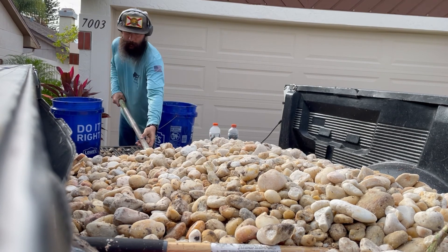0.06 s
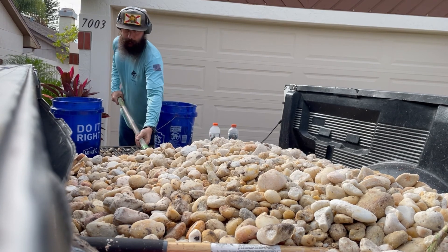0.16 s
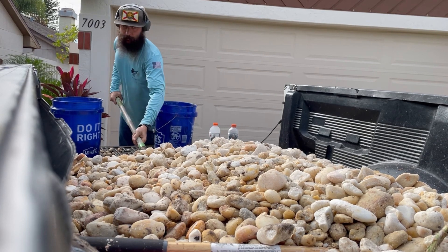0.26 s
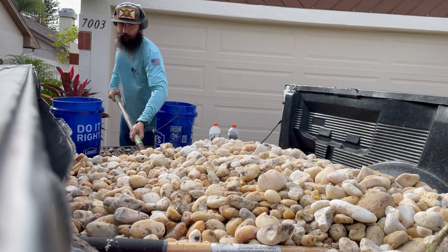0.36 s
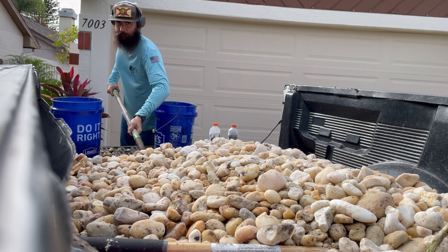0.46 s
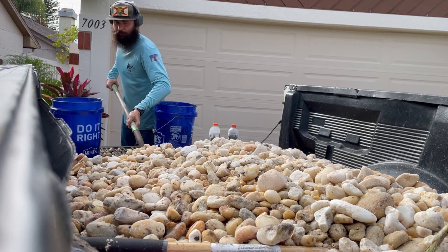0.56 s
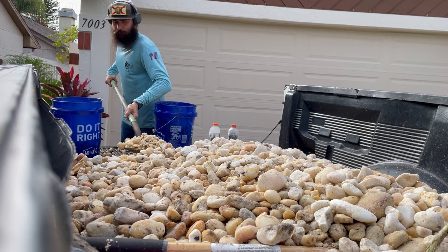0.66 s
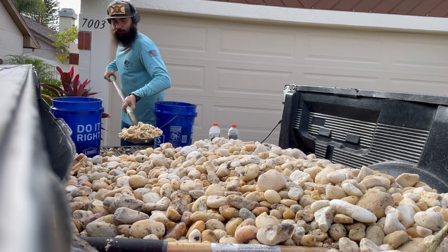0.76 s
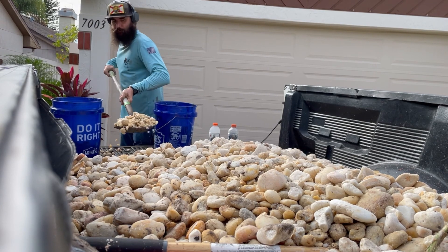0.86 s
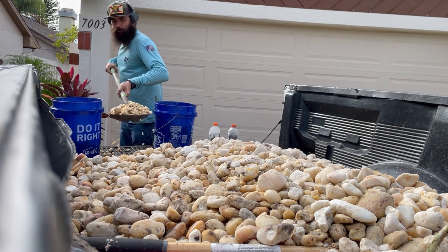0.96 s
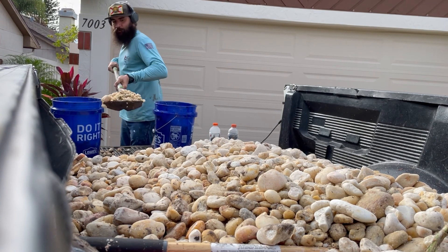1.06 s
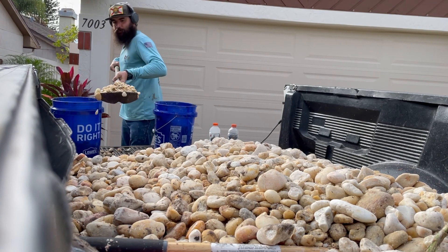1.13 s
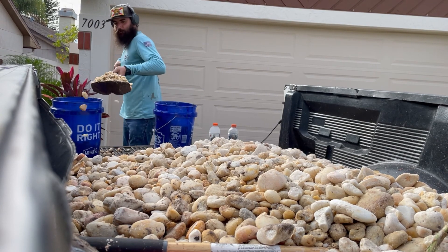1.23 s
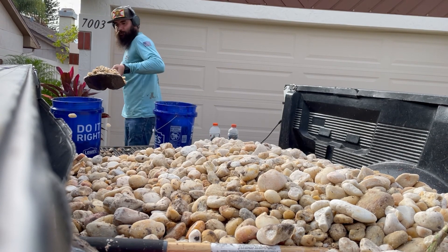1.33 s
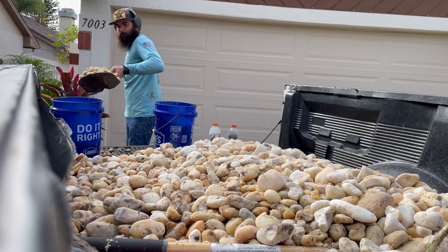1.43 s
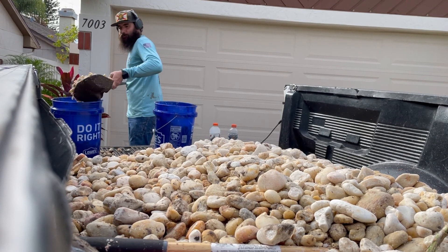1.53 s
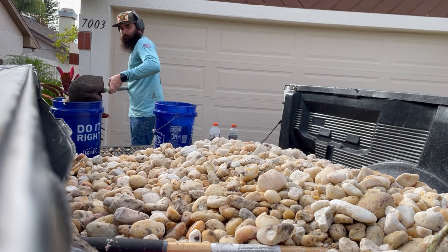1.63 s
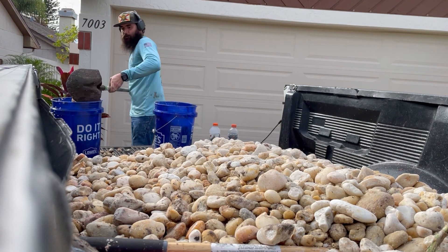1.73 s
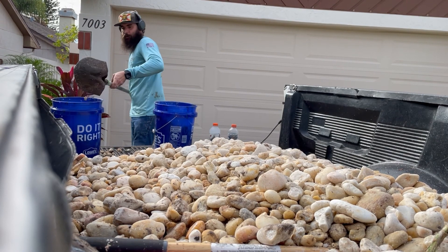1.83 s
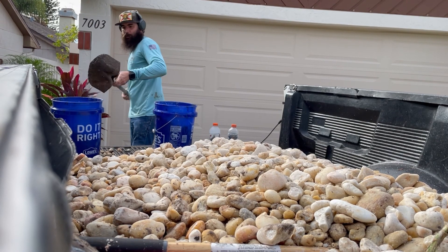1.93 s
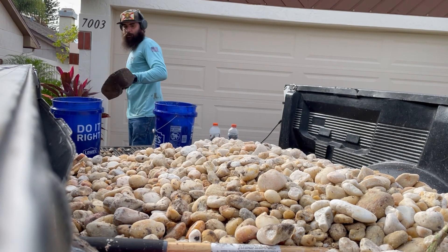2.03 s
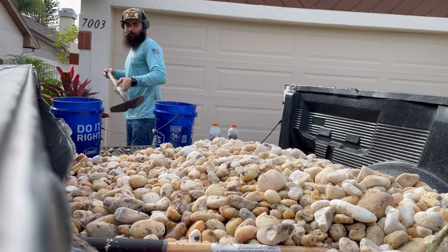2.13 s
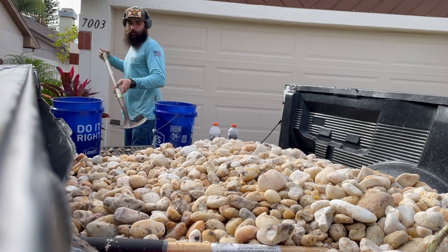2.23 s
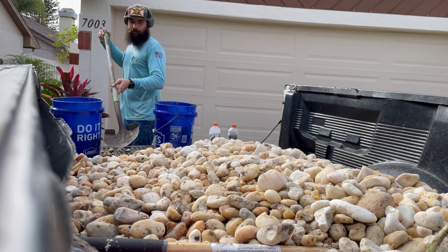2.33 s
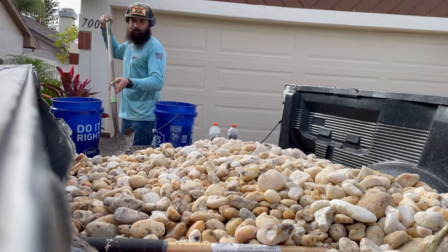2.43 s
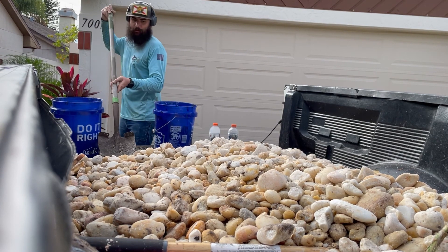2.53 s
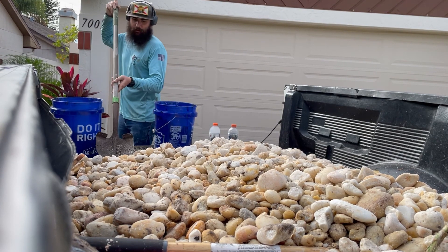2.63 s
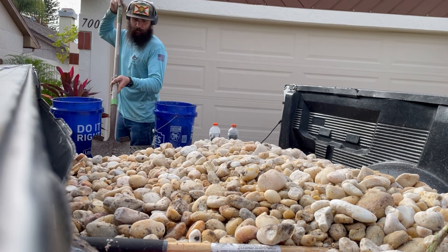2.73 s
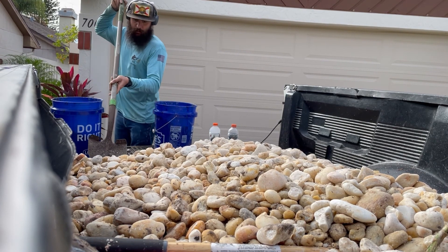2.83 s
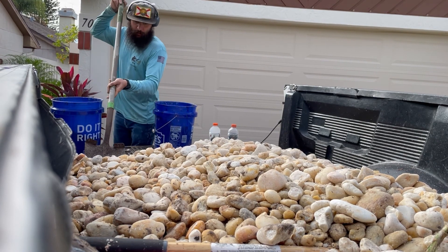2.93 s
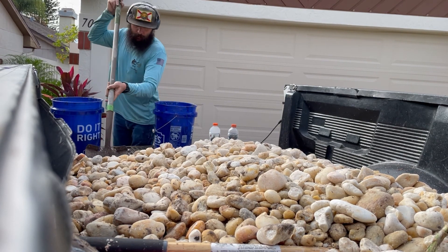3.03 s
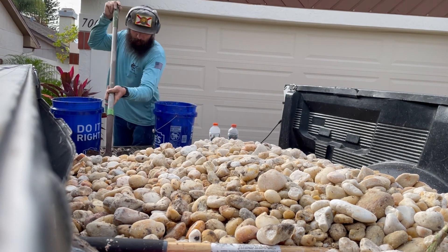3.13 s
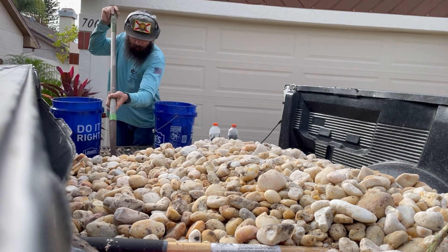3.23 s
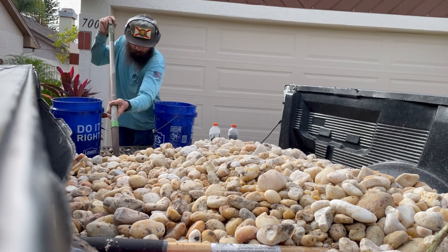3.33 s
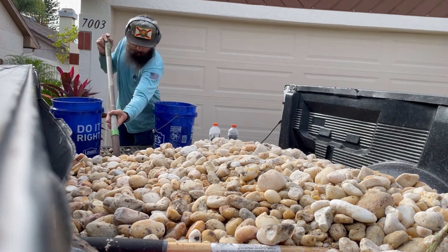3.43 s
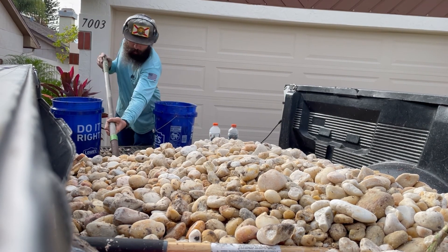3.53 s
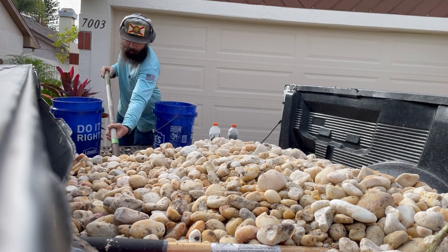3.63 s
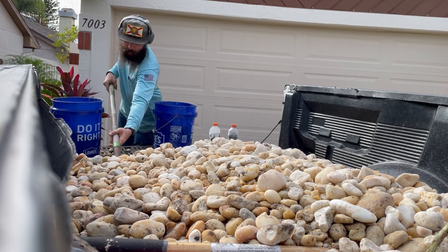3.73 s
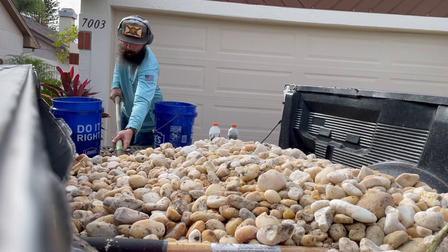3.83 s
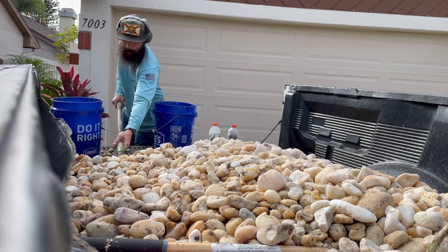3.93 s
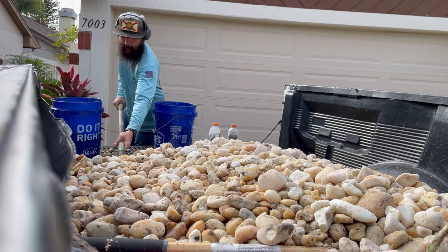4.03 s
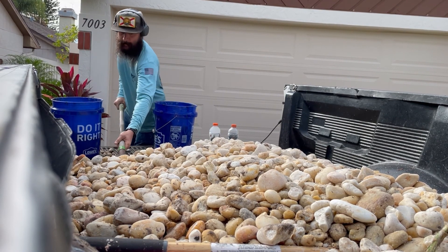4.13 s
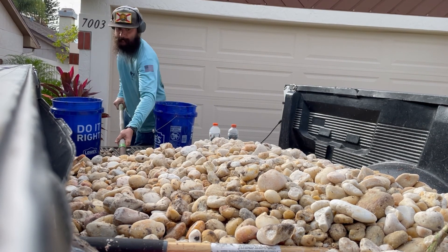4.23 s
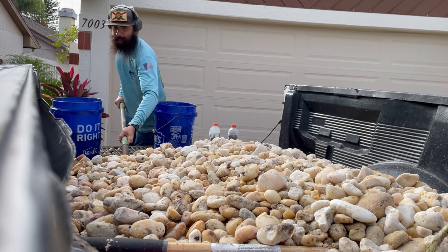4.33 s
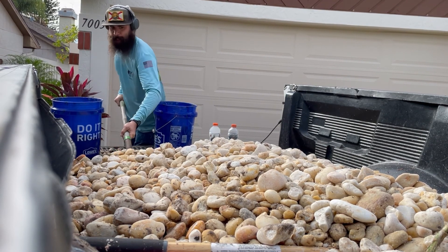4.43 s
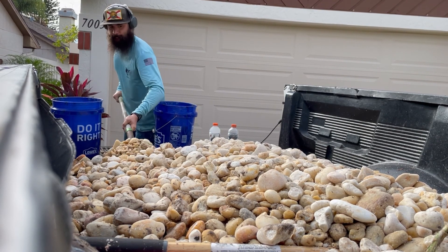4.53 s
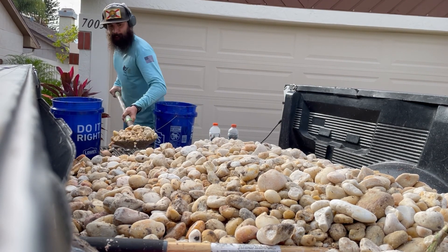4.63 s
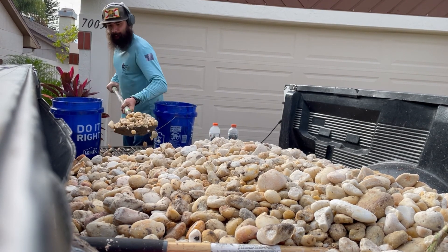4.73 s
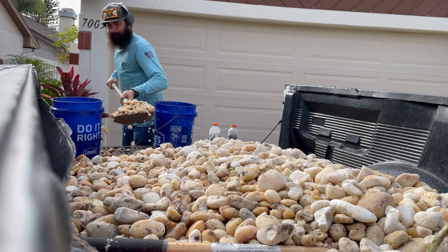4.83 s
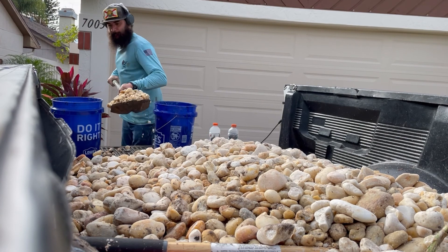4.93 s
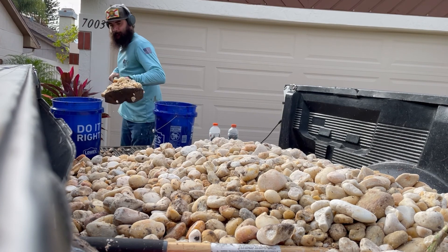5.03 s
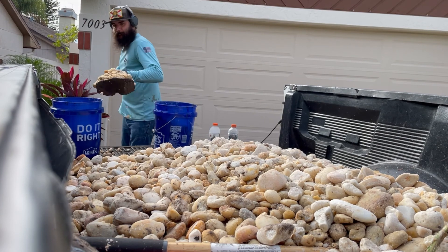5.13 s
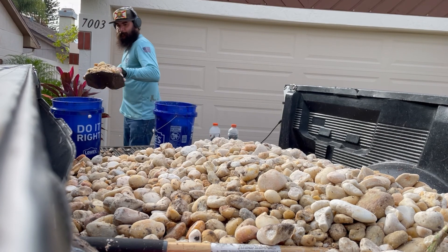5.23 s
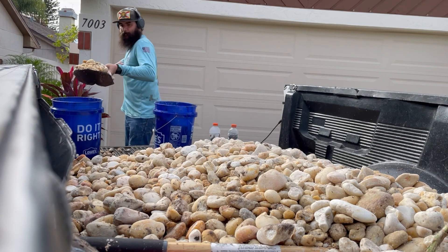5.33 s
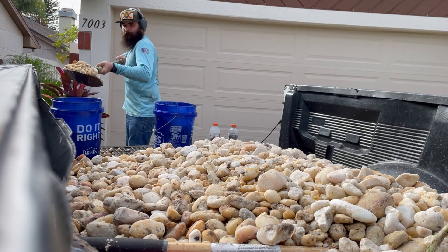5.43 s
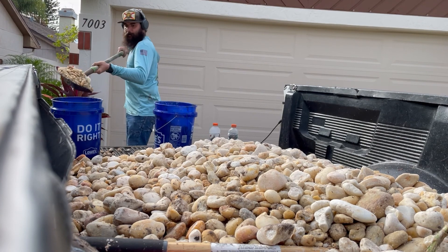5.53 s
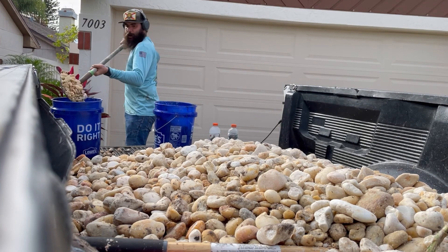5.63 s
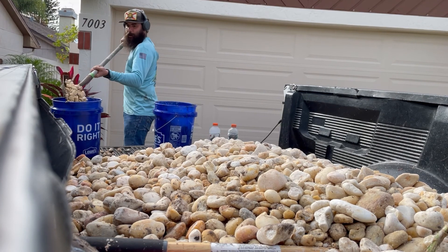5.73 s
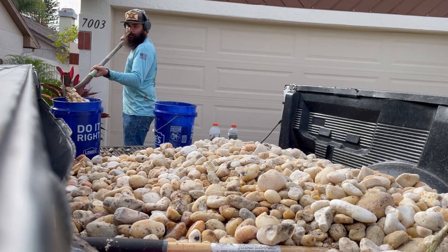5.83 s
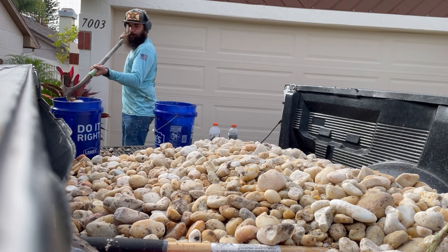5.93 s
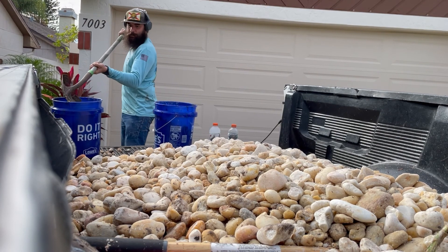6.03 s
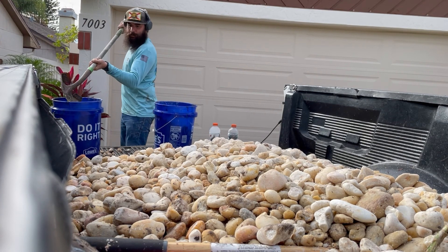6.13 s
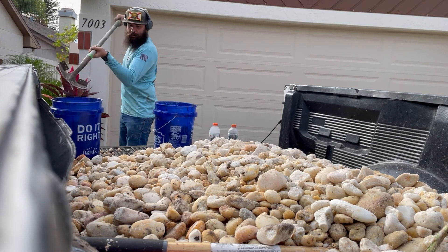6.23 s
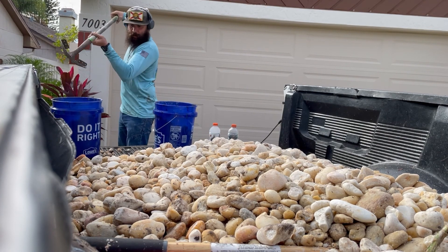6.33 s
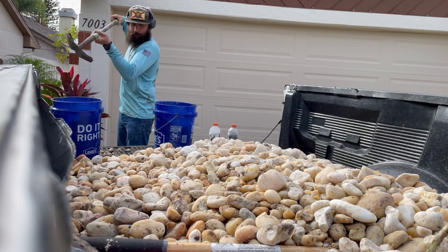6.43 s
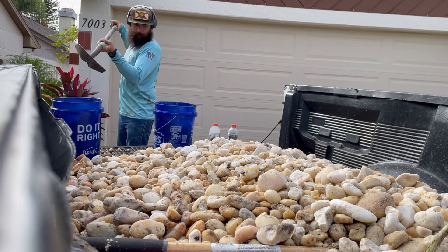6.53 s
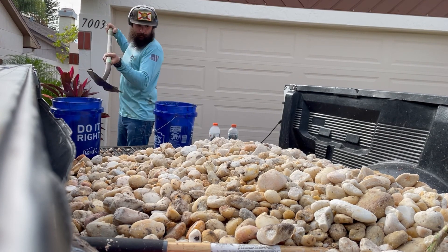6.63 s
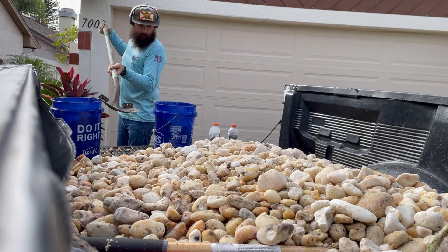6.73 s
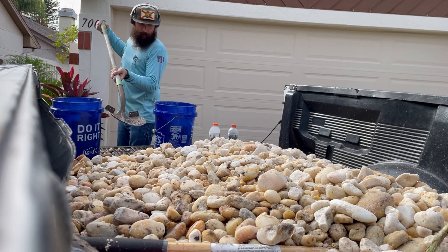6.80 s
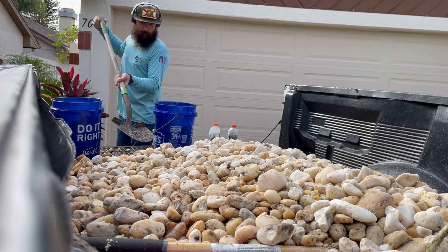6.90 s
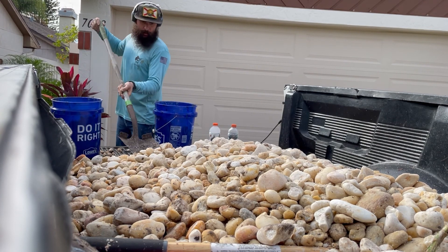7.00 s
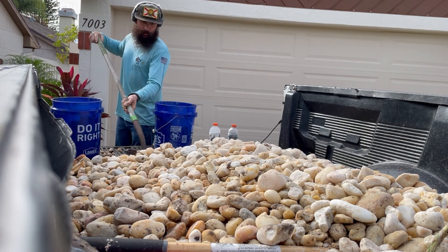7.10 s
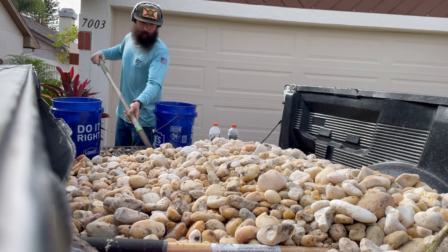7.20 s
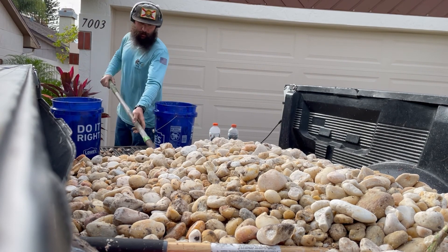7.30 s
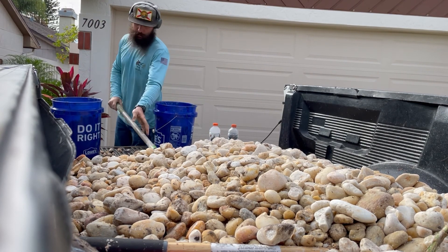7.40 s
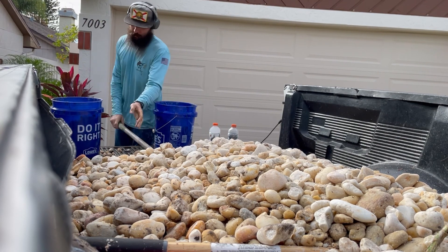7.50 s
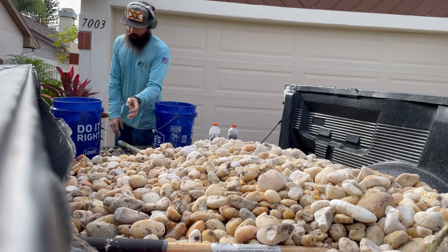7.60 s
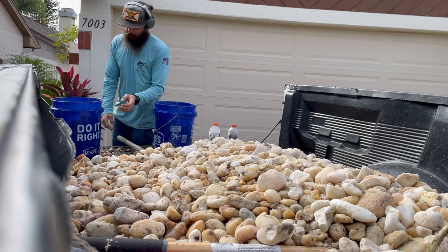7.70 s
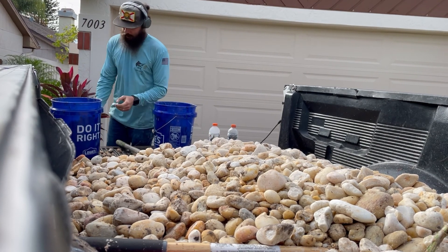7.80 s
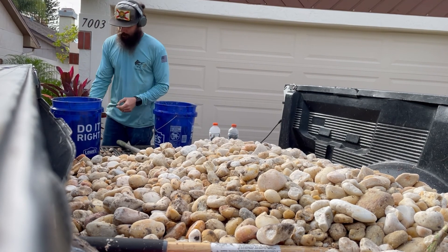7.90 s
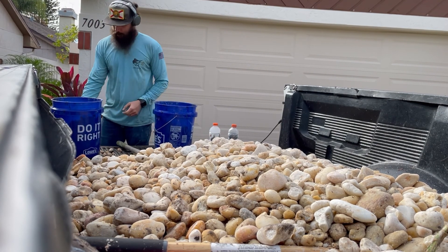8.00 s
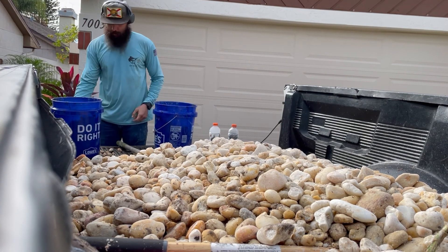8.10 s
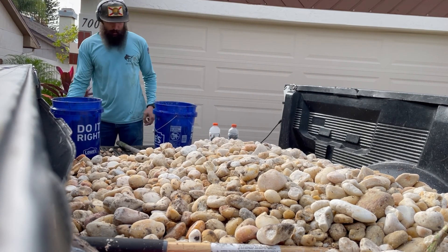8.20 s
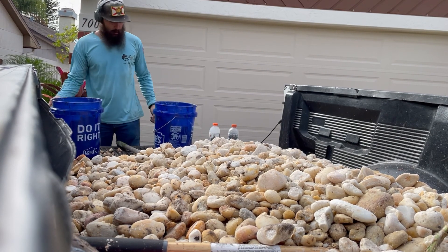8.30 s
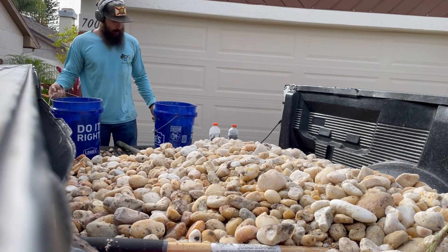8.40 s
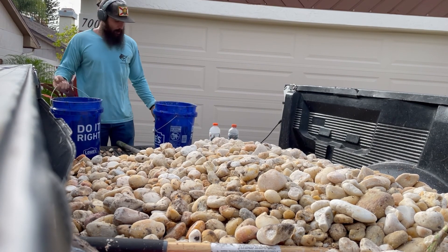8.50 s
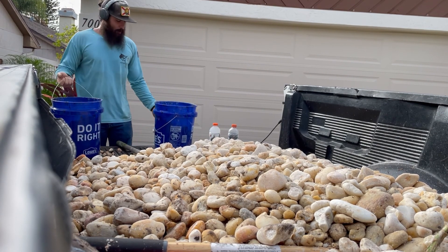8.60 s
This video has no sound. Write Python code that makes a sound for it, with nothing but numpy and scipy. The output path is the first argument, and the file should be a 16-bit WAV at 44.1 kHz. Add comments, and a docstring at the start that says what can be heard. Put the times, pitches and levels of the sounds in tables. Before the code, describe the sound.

Close in a pickup bed, a steel shovel finishes a scoop with grinding and knocks, then big stones drop and rattle into a hollow plastic bucket. A harsh, singing scrape follows as the blade drives in again, stones clack and snap, and a second load clatters down. Finally the shovel scrapes in and thuds onto the liner. Quiet driveway, faint low traffic, short echoes.

```python
"""A steel shovel digs river stones from a pickup bed and tips them into a plastic bucket, twice; then it is laid down.
The blade rasps and sings by stick-slip as it grinds through the pile; stones click together in random collisions,
knock on the ribbed liner as dispersive bending waves, and drum the modes of the bucket.
Heavy landings boom in the modes of the bed, whose side walls reflect the sound.
A phone with two ports lies in the bed, in a quiet driveway with a low rumble of far traffic."""
import sys
import numpy as np
from scipy import signal
from scipy.fft import rfft, irfft, next_fast_len
from scipy.io import wavfile
from scipy.ndimage import uniform_filter1d

SR = 44100
rng = np.random.default_rng(int(sys.argv[2]) if len(sys.argv) > 2 else 0)


def inscribe(sig):
    """Save sig as 16-bit PCM at rate SR to the path in sys.argv[1].

    A 1-D sig is mono; a 2-D sig holds one channel per row.
    Samples are clipped to [-1, 1] before scaling.
    """
    pcm = np.round(np.clip(np.atleast_2d(sig).T, -1, 1) * 32767)
    wavfile.write(sys.argv[1], SR, pcm.astype(np.int16))


N = 381796
T = np.arange(N) / SR
RING_T = T[:12000]  # time axis of one collision

# Levels in the tables are relative: the functions add their own gains, and the echoes and filters follow.


def undb(db):
    """Logarithmic level: decibels to amplitude gain."""
    return 10 ** (np.asarray(db) / 20)


def unit(x):
    """Energy normalization: scale each row to an energy of one."""
    return x / np.sqrt(np.sum(x ** 2, axis=-1, keepdims=True))


def peak(x):
    """Peak normalization: scale a (mid, side) pair to a mid peak of one."""
    return x / np.abs(x[0]).max()


def on_bins(points, size):
    """Log-frequency interpolation: read a table over frequency at the bins of a transform."""
    hz, value = np.transpose(points)
    bins_hz = np.fft.rfftfreq(size, 1 / SR)
    return np.interp(np.log(bins_hz + 1), np.log(hz), value)


def colour(x, points):
    """Minimum-phase filtering: folding the cepstrum gives a causal filter with the tabled spectrum."""
    size = next_fast_len(x.shape[-1] // 2 + len(RING_T) // 2) * 2
    cepstrum = irfft(np.log(undb(on_bins(points, size))))
    response = np.exp(rfft(2 * cepstrum[:size // 2], size) - cepstrum[0])
    return irfft(rfft(x, size) * response)[..., :x.shape[-1]]


def through(x, response):
    """Convolution: pass a (mid, side) pair through an impulse response."""
    return signal.oaconvolve(x, response, axes=-1)[:, :x.shape[1]]


def add(out, s, sound):
    """Superposition: mix a (mid, side) sound in at a time in seconds."""
    start = max(int(s * SR), 0)
    out[:, start:start + sound.shape[1]] += sound[:, :N - start]


def fade(t60):
    """Exponential damping: a decay of 60 dB in t60 seconds."""
    return np.exp(-np.log(1000) * RING_T / t60)


def burst(t60):
    """High modal density: countless close modes die together as noise, independent in mid and side."""
    return unit(rng.standard_normal((2, len(RING_T))) * fade(t60))


def ring(modes, jitter=0.0047):
    """Modal synthesis: a blow at a random spot gives each detuned mode its own strength in mid and side."""
    waves = []
    for hz, db, t60 in modes:
        mode_hz = hz * (1 + jitter * rng.normal())
        waves.append(undb(db) * unit(fade(t60) * np.sin(2 * np.pi * mode_hz * RING_T)))
    shape = (2, len(modes))
    strength = rng.choice([-1, 1], shape) * rng.uniform(0.51, 1, shape)
    return unit(strength @ np.array(waves))


def contact(t60, settle_t60=0.021):
    """Gradual contact: a rough stone seats itself over a few milliseconds, and its crack dies away."""
    return unit(burst(t60) * (1 - fade(settle_t60)))


def gesture(start, rise_s, hold_s, fall_db_per_s, first_db=-9.0):
    """Energy envelope: a gain that starts at first_db, swells to one, holds and dies away."""
    age = T - start
    rise = first_db * np.clip(1 - age / rise_s, 0, 1)
    fall = fall_db_per_s * np.maximum(age - rise_s - hold_s, 0)
    return (age >= 0) * undb(rise - fall)


def wander(count):
    """Slow random modulation: drift joined by straight lines between count turning points."""
    return np.interp(T, np.linspace(0, T[-1], count), rng.standard_normal(count))


def surges(depth_db):
    """Granular avalanching: the gain of a flow that catches and slips."""
    return undb(depth_db * wander(count=260))


SPURT_RISE_S, SPURT_FALL_DB_PER_S = 0.0019, 189.5


def spurts(rows):
    """Brief excitation: runs that start at once, hold and stop quickly."""
    return sum(undb(db) * gesture(s, SPURT_RISE_S, length, SPURT_FALL_DB_PER_S) for s, length, db in rows)


# spectrum of far traffic: frequency_hz, level_db
TRAFFIC_TONE = [(15, -54.5), (25, -41), (59, -6), (118, -13), (196, -21.5), (475, -36.5), (750, -38.5),
                (1060, -43), (1350, -42.5), (3000, -60.5), (8780, -59.5), (15000, -74.5)]
TRAFFIC_DB = -44


def outdoor_air():
    """Distant broadband sources: far traffic is a low rumble that swells and sinks a little."""
    noise = unit(colour(rng.standard_normal((2, N)), TRAFFIC_TONE)) * np.sqrt(N)
    return undb(TRAFFIC_DB + wander(count=40)) * noise


# treble-heavy scattering by the ribbed walls: frequency_hz, level_db
SCATTER_TONE = [(400, -18), (3000, -2)]


def echoes(walls_t60=0.05, yard_t60=0.49, yard_db=-4):
    """Diffuse reflection: a quick decay off the bed walls and a longer tail from the house front."""
    walls = colour(burst(walls_t60), SCATTER_TONE)
    return unit((walls + undb(yard_db) * burst(yard_t60)) * (1 - fade(0.0077)))


# hands slide along the shaft and the bucket rim: start_s, length_s, level_db
RUBS = [(2.56, 0.18, -62), (6.42, 0.2, -65), (6.935, 0.022, -61), (8.2, 0.12, -56), (8.37, 0.07, -66),
        (8.54, 0.038, -63)]
# spectrum of that rubbing: frequency_hz, level_db
RUB_TONE = [(300, -1.5), (830, 9.5), (1020, -2), (1250, 12.5), (1600, 0.5), (2100, -2), (2500, 2.5),
            (3500, -9), (5500, -15), (12000, -15)]


def rubbing(surge_db=3):
    """Sliding friction: hands rub faintly over wood and plastic as coloured noise."""
    noise = unit(colour(rng.standard_normal((2, N)), RUB_TONE)) * np.sqrt(N)
    return spurts(RUBS) * surges(surge_db) * noise


# modes of the loaded blade: frequency_hz, level_db, t60_s
BLADE_MODES = [(643, -14.5, 0.076), (754, 8, 0.0055), (889, 1.5, 0.038), (1134, 0.5, 0.1),
               (1240, -6.5, 0.05), (1468, 6.5, 0.1), (1290, -11, 0.008), (1874, 13, 0.021),
               (2373, 1, 0.024), (3400, -2.5, 0.11), (4870, 5.5, 0.02)]
# spectrum of a stone on the blade: frequency_hz, level_db
BLADE_TONE = [(200, -8), (450, 2.5), (700, 3), (1000, 6), (1300, 1.5), (2000, -9.5), (3000, -7),
              (8000, -24.5)]


def blade_clack(crack_t60=0.098, ring_db=-4):
    """Damped plate modes: a stone strikes the steel blade, which the load damps and detunes."""
    return unit(colour(contact(crack_t60) + undb(ring_db) * ring(BLADE_MODES, jitter=0.0502), BLADE_TONE))


# spectra of clicks in the bed, clicks in the bucket and crushed grit: frequency_hz, level_db
CLICK_TONE = [(500, -19.5), (1500, 13), (2800, 0), (4400, 5), (6000, -1.5), (8500, 3.5), (10500, -3.5),
              (13500, -9.5), (16000, -12.5)]
POUR_CLICK_TONE = [(500, -31.5), (1500, 10.5), (2800, -3.5), (4400, -4), (6000, -9), (8500, -11),
                   (10500, -8.5), (13500, -16.5), (16000, -31)]
GRIT_TONE = [(2000, -13.5), (6000, -7), (9000, 2), (12000, -4), (16000, -10)]


def stone_click(tone, crack_t60=0.062, ring_db=-4):
    """Impact of small stiff bodies: a dry crack and three very brief random pitches."""
    pitches_hz = np.geomspace(2200, 12000, 200)[rng.integers(200, size=3)]
    modes = [(hz, 0, .012) for hz in pitches_hz]
    return unit(colour(contact(crack_t60) + undb(ring_db) * ring(modes), tone))


# spectrum of a stone on the bed floor: frequency_hz, level_db
KNOCK_TONE = [(30, -50.5), (65, 6), (120, -1.5), (180, 8.5), (310, -0.5), (480, -5), (750, -12),
              (1300, -21.5), (4000, -44.5)]


def bed_knock(travel=.14, panel_t60=0.039, panel_db=-1):
    """Dispersion of bending waves in the bed floor: highs arrive first, so each knock sweeps downward."""
    hz = np.fft.rfftfreq(len(RING_T), 1 / SR)
    # the phase gives a delay of travel / sqrt(frequency), travel in s * sqrt(Hz)
    sweep = irfft(np.exp(-4j * np.pi * travel * rng.uniform(0.684, 1.2) * np.sqrt(hz)))
    early = int(SR * .003)  # skip the first 3 ms of travel
    sweep = unit(np.pad(sweep[early:], (0, early)) * fade(0.26))
    place = np.array([[1], [rng.uniform(-1.2, 1)]])
    return unit(colour(place * sweep + undb(panel_db) * burst(panel_t60), KNOCK_TONE))


# modes of the bucket: frequency_hz, level_db, t60_s
BUCKET_MODES = [(198.3, -0.5, 0.081), (256, 4, 0.13), (298.5, -1.5, 0.22), (557, -5.5, 0.06),
                (800, 0, 0.04), (1153, -9, 0.071), (1358, -12, 0.046), (1890, -10.5, 0.1)]
# spectra of low drumming and bright clatter in the bucket: frequency_hz, level_db
DRUM_TONE = [(40, -23.5), (120, 2.5), (230, 3.5), (330, 1.5), (500, -3), (800, -1.5), (1500, -33.5),
             (4000, -49.5)]
CLATTER_TONE = [(250, -19.5), (550, -10), (800, -1.5), (1250, 6), (2000, -4), (3000, -5.5), (4500, -12.5),
                (9000, -21)]


def bucket_blow(tone, wall_t60=0.02, ring_db=-5, jitter=0.0854):
    """Shell and cavity resonance: a stone strikes the plastic wall and sounds the hollow of the bucket."""
    return unit(colour(contact(wall_t60) + undb(ring_db) * ring(BUCKET_MODES, jitter), tone))


# modes of a stone clapping on its neighbours: pitch_multiple, level_db
TOCK_MODES = [(.52, -5.5), (.88, -2), (1, 2), (1.13, -3), (1.55, -15.5)]


def stone_tock(hz, t60=0.027):
    """Scaled modes: a large stone claps on its neighbours with a few close, quickly damped pitches."""
    return ring([(hz * ratio, db, t60) for ratio, db in TOCK_MODES])


def any_tock(low_hz=560, high_hz=1900):
    """Log-uniform size distribution: the tock of a stone of random size."""
    return stone_tock(low_hz * (high_hz / low_hz) ** rng.random(), t60=0.082)


def shower(flow, blow, rate, scatter_db, count=40):
    """Random point process: many different collisions, up to rate per second; a louder flow has more."""
    chance = rate / SR * (flow / flow.max()) ** .62
    hits = (rng.random(N) < chance) * undb(scatter_db * np.minimum(rng.exponential(size=N), 4))
    # the collisions of each moment share the energy of the flow
    power = uniform_filter1d(uniform_filter1d(hits ** 2, size=1800), size=1800)
    hits *= flow / np.sqrt(np.abs(power) + 10 / SR)
    stones = [blow() for _ in range(count)]
    which = rng.integers(count, size=N)
    out = np.zeros((2, N))
    for i in np.flatnonzero(hits):
        add(out, T[i], hits[i] * stones[which[i]])
    return out


# light taps on the blade and the bucket rim: start_s, level_db
TAPS = [(2.542, -34), (5.491, -28), (6.289, -36), (6.3369, -32), (6.386, -32), (6.622, -32), (6.6536, -28),
        (8.246, -32), (8.542, -36)]


def handling(level_db=-3):
    """Light impact: faint taps as the shovel is swung about and the bucket is touched."""
    out = np.zeros((2, N))
    for s, db in TAPS:
        tap = blade_clack(crack_t60=0.14) + undb(-13) * stone_click(CLICK_TONE, crack_t60=.1)
        add(out, s, undb(db + level_db) * peak(tap))
    return out


# landings of the load or the shovel: start_s, contact_level_db, boom_level_db
THUDS = [(0.081, -29.5, -21.5), (1.462, -10.5, -22), (1.586, -29, -20.5), (7.161, -23, -16.5),
         (7.658, -13, -14.5), (7.822, -17.5, -16), (7.926, -23, -17), (8.008, -21.5, -18)]
# modes of the pickup bed: frequency_hz, level_db, t60_s
BED_MODES = [(70.5, 1, 0.49), (92.6, 1, 0.22), (107.8, 0.5, 0.28), (143, -6, 0.22)]
# spectrum of the shovel buzzing on the liner: frequency_hz, level_db
BUZZ_TONE = [(200, 4), (500, 0), (780, 5.5), (1100, -6.5), (1500, 0), (2400, -26), (7000, -30.5)]


def heavy_landings(boom_db=1, boom_lag=0.0091, buzz_db=-3, buzz_t60=0.3):
    """Structural resonance: a weight lands and chatters on the liner; the bed booms a moment later."""
    out = np.zeros((2, N))
    for s, db, boom in THUDS:
        add(out, s, undb(db) * peak(blade_clack(crack_t60=0.054) + undb(3.0) * bed_knock()))
        add(out, s, undb(db + buzz_db) * peak(colour(contact(buzz_t60), BUZZ_TONE)))
        shaken = ring(BED_MODES, jitter=0.03) * (1 - fade(0.16))
        add(out, s + boom_lag, undb(boom + boom_db) * peak(shaken))
    return out


# wedged stones snapping free: start_s, level_db, pitch_hz
SNAPS = [(0.1, -11, 575), (0.546, -20.5, 555), (1.106, -19.5, 555), (3.399, -16, 543), (3.527, -19.5, 850),
         (3.697, -20, 1080), (3.765, -14, 1650), (3.795, -15, 1460), (3.845, -6.5, 1548),
         (3.907, -16.5, 890), (3.998, -19, 1160), (4.309, -13, 1115), (4.744, -22, 1160), (4.77, -23, 1400),
         (4.84, -20, 1130), (4.965, -14, 1400), (7.353, -20, 1620)]


def snapping_stones(clack_db=-7):
    """Sudden release: a jammed stone slips, strikes its neighbour with a pitched tock and jars the blade."""
    out = np.zeros((2, N))
    for s, db, hz in SNAPS:
        add(out, s, undb(db) * peak(stone_tock(hz) + undb(clack_db) * blade_clack()))
    return out


# stones knocking on the bed: start_s, level_db, blade_clack_relative_db
KNOCKS = [(0.098, -13.5, 3.5), (0.395, -15.5, -25.5), (0.473, -15.5, -29), (0.863, -24.5, -33),
          (0.895, -20.5, -25), (1.001, -27, 1), (1.022, -18.5, -29), (1.107, -24.5, -18),
          (1.288, -27.5, -25), (3.122, -14, -26.5), (3.143, -11.5, -22), (3.527, -19.5, -11),
          (3.735, -13.5, -37), (3.765, -15, -10), (4.307, -16.5, -14), (4.397, -14.5, -22),
          (4.423, -21, -30), (4.622, -19.5, -11), (4.744, -15.5, -8), (4.77, -16, -28), (4.965, -8.5, -19),
          (4.996, -16, -12), (5.018, -12.5, -16), (5.325, -16.5, -22), (7.162, -17, -26),
          (7.184, -16, -14.5), (7.26, -21, -20), (7.304, -16, -15), (7.357, -14.5, -22),
          (7.405, -16.5, -29), (7.462, -18.5, -18), (7.683, -20, -34)]
# big stones falling into the bucket: start_s, level_db, clack_relative_db, click_relative_db, pitch_hz
DROPS = [(1.459, 3, -3.5, -13, 518), (1.477, -9, 1, 1, 3280), (1.497, -4.5, 4.5, -5.5, 676),
         (1.511, -4.5, 6.5, -16, 798), (1.671, -18.5, 12, -3, 784), (1.763, -3, 12, -13, 1260),
         (1.791, -11, 7, -17, 937), (1.899, -6, 18, 0, 920), (5.573, -22.5, -1, -31, 1390),
         (5.709, -11, 0, -4, 760), (5.857, -8.5, 18, 9, 1120), (5.885, -9.5, 25, 2, 1896),
         (5.903, -10, 17, -1, 2670), (5.948, -6, -13, -6, 703), (6.029, -13.5, 4, 7, 784)]
# sharp clinks of stone and steel: start_s, level_db, blade_clack_relative_db
CLINKS = [(0.543, -26, -16), (1.048, -27.5, -17), (1.104, -33, -11), (1.253, -20.5, -3),
          (1.3709, -7.5, -6.5), (1.684, -15.5, -19), (2.1331, -27.5, 7), (2.1991, -34.5, 8.5),
          (2.4434, -39, 15.5), (2.7522, -24.5, -11), (4.6184, -17, -20), (4.6982, -16, -25),
          (4.839, -28, 2), (4.8832, -21.5, -13), (4.9569, -24, 6), (4.997, -20, -23), (5.0924, -20, -27),
          (5.2644, -32, 10.5), (5.3232, -16, -11), (5.3291, -21, -31), (5.4149, -24, 0.5), (6.13, -23, -12),
          (7.3555, -18, 10)]
KNOCK_CLICK_DB = -21  # the stone's own click, relative to its knock
CHIP_LAG_S, CHIP_DB = 0.0028, -14.5  # a clinking stone skids on with a second, brighter tick


def single_stones(clack_db=5, drop_db=-4.5, clink_db=-3.5):
    """Isolated impacts: big stones knock on the bed or drop in the bucket, and stone clinks on steel."""
    out = np.zeros((2, N))
    for s, db, clack in KNOCKS:
        knock = bed_knock() + undb(clack + clack_db) * blade_clack()
        click = stone_click(CLICK_TONE, crack_t60=0.028)
        add(out, s, undb(db) * peak(knock + undb(KNOCK_CLICK_DB) * click))
    for s, db, clack, click, hz in DROPS:
        stone = unit(bucket_blow(CLATTER_TONE, wall_t60=0.08) + undb(2.5) * stone_tock(hz, t60=0.055))
        body = bucket_blow(DRUM_TONE, wall_t60=0.075, ring_db=-13, jitter=0.028) + undb(clack) * stone
        tick = stone_click(POUR_CLICK_TONE, crack_t60=0.088)
        add(out, s, undb(db + drop_db) * peak(body + undb(click) * tick))
    for s, db, steel in CLINKS:
        click = stone_click(CLICK_TONE, crack_t60=0.038, ring_db=-6.5)
        clink = click + undb(steel) * blade_clack(crack_t60=0.3)
        # the click alone sets the level
        add(out, s, undb(db + clink_db) * clink / np.abs(click[0]).max())
        add(out, s + CHIP_LAG_S, undb(db + CHIP_DB) * peak(stone_click(GRIT_TONE, crack_t60=0.025)))
    return out


# loads sliding into the bucket, the second in two rushes:
# start_s, swell_s, full_flow_s, fall_db_per_s, level_db
POURS = [(1.604, 0.085, 0.1, 63.5, -20.5), (5.671, 0.051, 0.08, 70, -26),
         (5.797, 0.065, 0.059, 95.5, -21.5)]
TRICKLE_DB, TRICKLE_FALL_DB_PER_S = -16.5, 46.5  # the last stones settle more slowly
POUR_SURGE_DB = 1.12


def pouring(drum_db=-6.5, clatter_db=-5, tock_db=-4, click_db=-7, click_growth=0.89):
    """Granular flow: a load slides off the blade and rattles down in the bucket; the last stones trickle."""
    flow = 0
    for s, swell, hold, fall, db in POURS:
        rush = gesture(s, swell, hold, fall)
        trickle = undb(TRICKLE_DB) * gesture(s, swell, hold, TRICKLE_FALL_DB_PER_S)
        flow = flow + undb(db) * np.hypot(rush, trickle)
    flow = flow * surges(POUR_SURGE_DB)
    drum = shower(flow, lambda: bucket_blow(DRUM_TONE), rate=200, scatter_db=4)
    clatter = shower(flow, lambda: bucket_blow(CLATTER_TONE), rate=220, scatter_db=3.5)
    click_flow = flow.max() * (flow / flow.max()) ** click_growth
    clicks = shower(click_flow, lambda: stone_click(POUR_CLICK_TONE), rate=640, scatter_db=0.0)
    tocks = shower(flow, any_tock, rate=95, scatter_db=3.5)
    low = undb(drum_db) * drum + undb(tock_db) * tocks
    return low + undb(clatter_db) * clatter + undb(click_db) * clicks


# steel scraping along, one curve a thrust: start_s, rasp_level_db, singing_level_db, pitch_hz
SCRAPES = [
    [(2.754, -39.5, -44.5, 1970), (2.82, -52, -57.5, 1940), (2.87, -42.5, -34, 1910),
     (2.98, -29, -34.5, 1850), (3.18, -23.5, -32, 1824), (3.4, -25, -35, 1724), (3.53, -48, -66, 1650)],
    [(7.16, -37.5, -54, 1950), (7.27, -30, -37, 1900), (7.335, -58, -52, 1920), (7.36, -26.5, -41, 1980),
     (7.45, -38.5, -30, 1920), (7.54, -37, -37.5, 1885), (7.6, -32, -53, 1930), (7.625, -58, -62, 1870)],
]
# spectrum of the rasp: frequency_hz, level_db
RASP_TONE = [(250, -16), (700, 2.5), (1300, 7.5), (2300, 3.5), (3500, 0), (6000, -6.5), (10500, -9),
             (14000, -19)]
# singing modes of the steel: pitch_multiple, level_db, t60_s
STEEL_MODES = [(0.432, 2, 0.13), (.587, -4, .08), (.735, 4.5, 0.08), (1, 3, 0.09), (1.56, -5, .04),
               (1.83, -4.5, 0.061), (2.14, -6, .06), (2.47, -11, .04), (2.78, -18.5, .04)]
# the echo off the bed floor comes later as the blade moves away
FLOOR_LAG_S, FLOOR_LAG_S_PER_S, FLOOR_ECHO_DB = 0.0013, .0007, -10.5


def scraping(sing_db=-7, catches_per_s=550, waver=0.016, patchy_db=3, surge_db=2):
    """Stick-slip friction: each catch of a dense rasp kicks modes that bend and trade strength."""
    out = np.zeros((2, N))
    for stroke in SCRAPES:
        s, rasp, sing, pitch = np.transpose(stroke)
        t = T[int(s[0] * SR):int(s[-1] * SR) + len(RING_T)]
        caught = rng.random(len(t)) < catches_per_s / SR
        catches = caught * rng.standard_normal((2, len(t))) * np.sqrt(SR / catches_per_s)
        catches = catches * surges(surge_db)[:len(t)]
        hiss = unit(colour(through(catches, contact(.012)), RASP_TONE)) * np.sqrt(len(t))
        hiss = hiss * undb(np.interp(t, s, rasp, -120, -120))
        lag = FLOOR_LAG_S + FLOOR_LAG_S_PER_S * (t - s[0])
        floor_echo = np.array([np.interp(t - lag, t, row) for row in hiss])
        add(out, s[0], hiss + undb(FLOOR_ECHO_DB) * floor_echo)
        kicks = catches * np.interp(t, s, undb(sing), 0, 0)
        for ratio, mode_db, t60 in STEEL_MODES:
            hz = ratio * np.interp(t, s, pitch) * (1 + waver * wander(count=400)[:len(t)])
            pole = np.exp(-np.log(1000) / (t60 * SR))
            spin = np.exp(2j * np.pi * np.cumsum(hz) / SR)
            # a resonator in a frame that turns with the gliding pitch
            mode = (spin * signal.lfilter([1], [1, -pole], kicks / spin)).imag
            gain = undb(mode_db + sing_db + patchy_db * wander(count=150)[:len(t)])
            add(out, s[0], gain * mode * np.sqrt(2 * (1 - pole ** 2)))
    return out


# push of the blade in the pile, one curve a stroke (scoop and lift, drive in, lever and lift,
# slide in again): start_s, effort_db
STROKES = [
    [(0, -24), (.12, -27.5), (.33, -29.5), (.5, -35.5), (.69, -46.5), (.8, -44), (.97, -45.5), (1.13, -47),
     (1.22, -80)],
    [(2.755, -41), (2.78, -31.5), (2.82, -39), (2.87, -30.5), (3.05, -26.5), (3.19, -21), (3.3, -21.5),
     (3.41, -20.5), (3.52, -32.5), (3.66, -34)],
    [(3.66, -32.5), (3.77, -30), (3.92, -35), (4.12, -32), (4.25, -26.5), (4.47, -32.5), (4.59, -36.5),
     (4.73, -36.5), (4.88, -42.5), (5.04, -39), (5.24, -74)],
    [(7.18, -32.5), (7.24, -37), (7.27, -33), (7.335, -34.5), (7.36, -28.5), (7.48, -31), (7.6, -40.5),
     (7.64, -56)],
]
FULL_PUSH_DB, PUSH_SURGE_DB = -22.5, 2.33
RATTLE_DB, RATTLE_FALL_DB_PER_S = -19.5, 168  # loose stones after each heavy landing


def effort():
    """Driving force: how hard strokes and landings stir the stones, one at a full push."""
    push = 0
    for stroke in STROKES:
        s, db = np.transpose(stroke)
        push = push + np.interp(T, s, undb(db), 0, 0)
    rattle = sum(undb(db + RATTLE_DB) * gesture(s, 0.0017, 0.0048, RATTLE_FALL_DB_PER_S) for s, db, _ in THUDS)
    return np.hypot(push * surges(PUSH_SURGE_DB), rattle) / undb(FULL_PUSH_DB)


# the edge bites into the pile and crushes grit: start_s, length_s, level_db
BITES = [(0, 0.35, -43.5), (2.754, 0.019, -30), (2.843, 0.073, -28.5), (2.96, 0.43, -29),
         (7.158, 0.007, -21), (7.255, 0.035, -30), (7.35, 0.19, -41.5)]
# loose stones and grit shift on the lifted blade: start_s, length_s, level_db
SHIFTS = [(.745, 0.0055, -41.5), (.8, 0.12, -49.5), (1.05, 0.11, -47), (4.53, 0.021, -39),
          (5.055, 0.014, -39.5), (5.44, 0.33, -61), (6.68, 0.0283, -59), (6.745, 0.0066, -83.5),
          (7.765, 0.012, -41.5)]
# how firmly the stones bear on the bed floor: start_s, level_db
BEARING = [(3.12, 0), (3.3, -1.5), (3.55, -1), (3.68, -6.5), (3.76, 0.5), (3.9, -5), (4.4, 2), (4.62, 2.5),
           (5.1, 3.5), (7.2, 2), (7.45, -3), (7.58, -3)]
# spectrum of the floor shuddering under the pile: frequency_hz, level_db
RUMBLE_TONE = [(28, -27.5), (50, -13), (72, 1.5), (112, -4.5), (170, -12.5), (250, -7), (500, -41)]
KNOCK_GROWTH, CLICK_GROWTH, RUMBLE_GROWTH = .82, 0.9, 0.7  # dB per dB of effort
BITE_SURGE_DB = 4


def digging(knock_db=-22.5, grind_db=-25, click_db=-33.5, bite_click_db=-4.5, tock_db=-28.0,
            rumble_db=-31, grit_db=-2):
    """Granular shear: the blade shoves stones over the floor and one another; the floor shudders."""
    push = effort()
    bite = spurts(BITES) * surges(BITE_SURGE_DB)
    bearing = undb(np.interp(T, *np.transpose(BEARING)))
    knocks = shower(bearing * push ** KNOCK_GROWTH, bed_knock, rate=330, scatter_db=2.5)
    grind = shower(push, blade_clack, rate=550, scatter_db=3.5)
    jostle = np.hypot(undb(click_db) * push ** CLICK_GROWTH, undb(bite_click_db) * bite + spurts(SHIFTS))
    clicks = shower(jostle, lambda: stone_click(CLICK_TONE), rate=700, scatter_db=4.5, count=32)
    tocks = shower(push, any_tock, rate=70, scatter_db=4)
    rumble = shower(push ** RUMBLE_GROWTH, lambda: unit(colour(contact(0.073), RUMBLE_TONE)),
                    rate=84, scatter_db=8.0, count=10)
    # crushed grit adds a bright sizzle to each bite
    grit = shower(bite, lambda: stone_click(GRIT_TONE), rate=4100, scatter_db=-0.5, count=24)
    low = undb(knock_db) * knocks + undb(rumble_db) * rumble
    middle = undb(grind_db) * grind + undb(tock_db) * tocks
    return low + middle + clicks + undb(grit_db) * grit


# standing waves between the bed walls: frequency_hz, level_db
BED_TONE = [(120, 1), (265, -1.5), (430, 1.5), (540, 2.5), (660, 2), (785, 1), (1020, -2.5), (1260, 0),
            (1650, -3.5), (1900, -1), (4500, 0)]
# spectrum of the reflections: frequency_hz, level_db
ECHO_TONE = [(100, 1), (500, 1), (1500, -2.5), (6000, 0), (14000, -2.5)]
# spectrum of the sound the two ports do not share: frequency_hz, level_db
SPREAD = [(60, -7), (300, -2), (1000, -5.5), (4500, -4), (6000, 5), (7500, -11), (8400, -76.5),
          (9700, -36.5), (11400, -6.5), (13000, -19), (14300, -10)]


def scene(echo_db=-6, side_db=-4.0):
    """Superposition: the sounds and their echoes, turned from (mid, side) into left and right."""
    dry = digging() + pouring() + single_stones() + snapping_stones() + heavy_landings() + handling()
    dry = colour(dry + scraping(), BED_TONE) + rubbing()
    reflected = through(dry, colour(echoes(), ECHO_TONE))
    mid, side = dry + undb(echo_db) * reflected + outdoor_air()
    side = undb(side_db) * colour(side, SPREAD)
    return np.array([mid + side, mid - side])


# level of the left port over the right: frequency_hz, difference_db
BALANCE_DB = [(60, -3.4), (200, -4), (500, -1.5), (1100, 0), (1400, -2.5), (1750, 0), (2300, -4.5),
              (4300, -3), (5900, -6), (7100, -.3)]
# phase lead of the left port over the right: frequency_hz, lead_rad
LEAD = [(100, 0), (1600, .6), (3300, -.3), (4100, .2), (5300, -.5), (6700, -3), (8400, -3.14), (10800, -.1),
        (12100, .05), (13900, 3.1), (16000, 3.3)]
TOP_HZ = 15800


def record(dry):
    """Transduction: the ports differ in level and phase; the phone rounds high peaks and cuts the top."""
    size = 2 * next_fast_len(N // 2 + len(RING_T))
    # each port takes half of the difference
    left = undb(on_bins(BALANCE_DB, size) / 2) * np.exp(.5j * on_bins(LEAD, size))
    ports = irfft(rfft(dry, size) * np.array([left, 1 / left]))[:, :N]
    top_cut = signal.ellip(10, .2, 80, TOP_HZ, fs=SR, output="sos")
    return signal.sosfilt(top_cut, np.tanh(ports))


dry = scene()
out = record(dry)
inscribe(out)
```